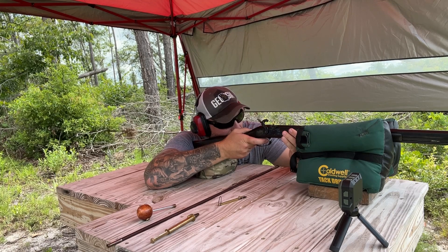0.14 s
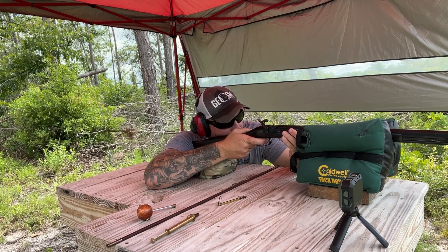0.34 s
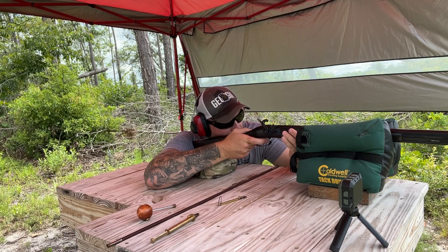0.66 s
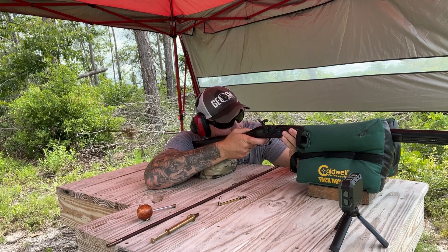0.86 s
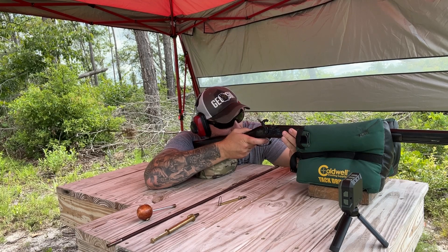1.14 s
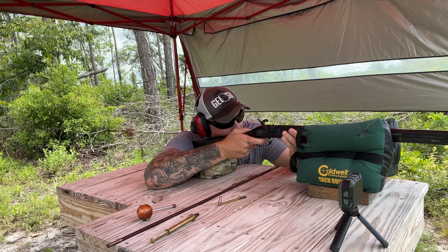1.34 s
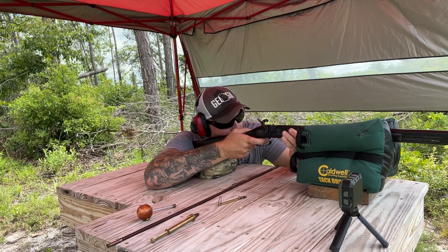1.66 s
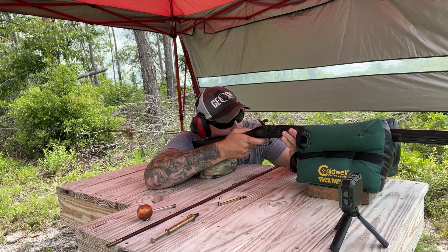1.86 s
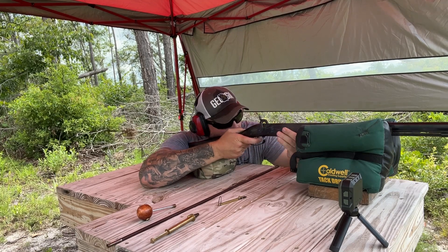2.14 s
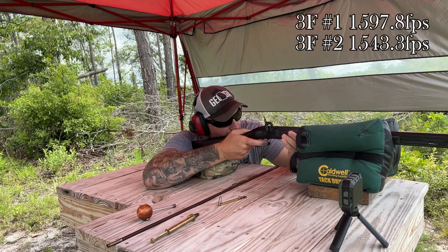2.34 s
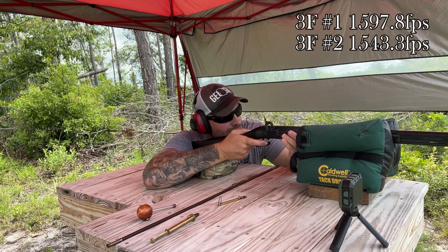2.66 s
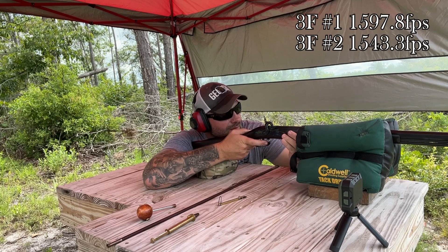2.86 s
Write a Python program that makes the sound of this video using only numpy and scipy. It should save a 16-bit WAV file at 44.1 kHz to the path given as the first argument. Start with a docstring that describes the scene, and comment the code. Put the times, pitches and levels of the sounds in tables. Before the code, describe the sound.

A rifle fires once, close to the microphone, after about two seconds of quiet woods with faint insects and two distant bird whistles. The sharp blast booms briefly, then a rolling echo returns from the trees and fades.

```python
"""A muzzleloading rifle in the woods

Insects, a low rumble and two bird whistles are heard. Then a rifle is fired from a bench under a
canopy: a brief ring swells into the crack of the cap and the overloaded blast. The shelter and near
trees answer, then the far tree line throws back a long roll that dulls as it dies."""
import sys
import numpy as np
from scipy import signal
from scipy.fft import rfft, irfft
from scipy.io import wavfile

SR = 44100
rng = np.random.default_rng(int(sys.argv[2]) if len(sys.argv) > 2 else 0)


def dump(signal):
    """Clip the signal to [-1, 1] and save it as 16-bit WAV at the path in sys.argv[1]."""
    limited = np.clip(np.atleast_2d(signal).T, -1, 1)
    pcm = np.round(limited * 32767).astype(np.int16)
    wavfile.write(sys.argv[1], SR, pcm)


N = 132300
T = np.arange(N) / SR
HZ = np.maximum(np.arange(N // 2 + 1) * SR / N, 1)
BLAST_S = 2.0468
SHELTER_S, SHELTER_ATTACK_S, SHELTER_HOLD_S = 2.063, 0.0082, 0.017

# How sound from the rifle reaches the left and right sides.
# Each row: frequency in Hz, how alike the sides are from 0 to 1, the left side's lead in radians.
FROM_RIFLE = [(60, 0.65, 1.8), (202, .5, 1.5), (440, 0.33, -1.83), (850, 0.63, -1.34), (1540, 0.38, -1.26),
              (2770, 0.41, -2), (4640, 0.34, -2.1), (7300, 0.28, -1.4), (10540, 0.67, 1.5)]
# The same for sound from down the range. Each row: frequency in Hz, likeness, left lead in radians.
FROM_DOWNRANGE = [(60, 0.72, 0.36), (180, 0.84, -0.5), (367, 0.81, -1.4), (740, 0.81, -2.6),
                  (1440, 0.56, -3.5), (2800, 0.22, -6.5), (4600, 0.06, -7.5), (7600, 0.35, -7.5),
                  (10400, 0.84, -6)]
# The roll from the woods. Each row: frequency in Hz, relative level in dB, seconds to fade by 60 dB.
WOODS_ROLL = [(30, -3.5, 1.6), (60, 0, 1.5), (172, -1.5, 3.2), (426, -6, 5.2), (830, -3.5, 3.35),
              (1490, -8, 2.44), (2960, -14, 2.2), (4980, -15.5, 1.33), (7200, -20, 1.16),
              (10000, -23.5, 0.88), (12100, -37, 0.76), (14000, -74, 0.71)]


def from_db(db):
    """Turn decibels into a factor to multiply by."""
    return 10 ** (np.asarray(db) / 20)


def unit_power(x):
    """Scale a sound so that its average power is 1."""
    return x / np.sqrt(np.mean(x ** 2) + 1e-20)


def at_hz(points, hz, column=1):
    """Look up a frequency in a table, sliding smoothly between the rows."""
    table = np.array(points)
    return np.interp(np.log(hz), np.log(table[:, 0]), table[:, column])


def side_phases(direction, hz):
    """Phase shifts in radians that put one side ahead and the other behind."""
    return 0.5 * at_hz(direction, hz, column=2) * np.array([[1], [-1]])


def noise(colour, direction, common=None):
    """Stereo noise shaped by a table of levels; the part both sides share comes from one direction."""
    likeness = np.clip(at_hz(direction, HZ), 0, 1)
    white = rng.standard_normal((3, N))
    shared = rfft(white[2] if common is None else unit_power(common))
    turn = np.exp(1j * side_phases(direction, HZ))
    both = np.sqrt(likeness) * shared * turn + np.sqrt(1 - likeness) * rfft(white[:2])
    return unit_power(irfft(both * from_db(at_hz(colour, HZ)), N))


def rifle_tone(hz, start, wobble=0):
    """A pure tone from the direction of the rifle; wobble shifts its phase, in radians."""
    return np.sqrt(2) * np.sin(2 * np.pi * hz * (T - start) + wobble + side_phases(FROM_RIFLE, hz))


def envelope(start, attack, hold, t60):
    """Rise over attack, stay for hold, then fade by 60 dB every t60; all are in seconds."""
    age = T - start
    fade = np.exp(-np.log(1000) * np.clip((age - attack - hold) / t60, 0, 5))
    return np.clip(age / attack, 0, 1) * fade


def drift(per_s):
    """Wander around zero, heading for a new random value per_s times a second."""
    return np.interp(T * per_s, np.arange(1000), rng.standard_normal(1000))


def background():
    """A low rumble under two choruses of insects; all drop at the shot and creep back."""
    # Sound from the undergrowth. Each row: frequency in Hz, left-right likeness, left lead in radians.
    from_undergrowth = [(60, 0.93, -0.23), (180, 0.83, -0.44), (353, 0.39, 0), (700, 0.37, -3.5),
                        (1400, .35, -5), (2700, 0.31, -6.5), (4600, .1, -8), (7710, .84, -8),
                        (9900, .95, -6.5)]
    # Rumble and leaves, high insects, and a farther chorus that throbs and swells.
    # Each row: frequency in Hz, relative level in dB.
    rumble_colour = [(25, -24.5), (49, -8), (86, -0.5), (124, -8), (160, -7.5), (250, -17), (540, -25),
                     (800, -33.5), (1150, -42.5), (1600, -45), (2150, -44), (2700, -38), (3600, -38.5),
                     (4800, -37), (5800, -42.5), (7800, -70.5)]
    insect_colour = [(5800, -30), (6600, -8.5), (7300, -5), (7750, -8), (8250, 3.5), (8550, -7),
                     (8900, -19.5), (10000, -21.5), (11000, -39), (15000, -44.5)]
    chorus_colour = [(2200, -42), (2650, -8.5), (3000, -0.5), (3350, -6.5), (3900, -37.5), (8000, -60)]
    throb_db, throbs_per_s, swell_db_per_s, hush_db = 3, 14, 3.6, -22.5
    rumble = from_db(-55.5 + 0.58 * drift(11.85)) * noise(rumble_colour, from_undergrowth)
    insects = from_db(-63.5 + 0.5 * drift(30)) * noise(insect_colour, from_undergrowth)
    throb = throb_db * np.sin(2 * np.pi * throbs_per_s * T + 2 * drift(5))
    chorus_db = -86 + swell_db_per_s * T + throb + 2 * drift(20)
    chorus = from_db(chorus_db) * noise(chorus_colour, from_undergrowth)
    hush = from_db(hush_db * envelope(BLAST_S, attack=0.0106, hold=0, t60=17))
    return (rumble + insects + chorus) * hush


def bird():
    """Distant whistles rise, level off and linger among the trees."""
    # The whistles. Each row: start and length in seconds, first pitch and target pitch in Hz,
    # glide time in seconds, level in dB.
    whistles = [(.863, .112, 1620, 1803, .017, -72.5), (1.475, 0.11, 1690, 2020, .035, -66.5)]
    # Their echoes from the trees. Each row: delay in seconds, level in dB relative to the whistle.
    whistle_echoes = [(.055, -15), (.31, -16.5)]
    fade_db_per_s = 28
    song = np.zeros(N)
    for start, length, first_hz, target_hz, glide, db in whistles:
        age = np.clip(T - start, 0, length)
        hz = target_hz + (first_hz - target_hz) * np.exp(-age / glide)
        arch = np.sqrt(np.abs(np.sin(np.pi * age / length)))
        song += from_db(db - fade_db_per_s * age) * arch * np.sin(2 * np.pi * np.cumsum(hz) / SR)
    echoes = sum(from_db(db) * np.interp(T - delay, T, song, left=0) for delay, db in whistle_echoes)
    trees = rng.standard_normal((2, N)) * envelope(0, attack=0.02, hold=0, t60=1.6)
    lingering = signal.fftconvolve(song[None], unit_power(trees) / np.sqrt(N), axes=1)[:, :N]
    return song + echoes + from_db(-6) * lingering


def far_trees():
    """A farther stand of trees sends back one late, dull swell."""
    # The tone of the swell. Each row: frequency in Hz, relative level in dB.
    colour = [(30, -20), (80, 1.5), (350, -4), (1200, -9), (3000, -46), (10000, -67)]
    swell = envelope(2.75, attack=0.016, hold=0.049, t60=0.26)
    return from_db(-39) * noise(colour, FROM_DOWNRANGE) * swell


def tree_clumps():
    """Clumps of trees send back short, low surges."""
    # The surges. Each row: start in seconds, level in dB, centre frequency in Hz.
    surges = [(2.559, -36.5, 350), (2.605, -35.5, 220), (2.668, -41, 550), (2.698, -40, 650),
              (2.805, -34.5, 330), (2.878, -39.5, 280), (2.912, -43.5, 480)]
    edge_ratio = 1.48
    roll, out = noise(WOODS_ROLL, FROM_DOWNRANGE), 0
    for start, db, hz in surges:
        band = signal.butter(1, [hz / edge_ratio, hz * edge_ratio], "band", fs=SR, output="sos")
        surge = unit_power(signal.sosfilt(band, roll))
        out += from_db(db) * surge * envelope(start, attack=0.0048, hold=0.0098, t60=0.05)
    return out


def woods():
    """Thousands of trunks each return a click, making a roll; the air takes the treble first."""
    # Lumpy bass and smooth treble. Each row: frequency in Hz, rough size of the flicker in dB.
    flicker_sizes = [(100, 2.6), (500, 2.4), (2000, 1.1), (8000, .5)]
    trunks_per_s, spread_db = 1100, 3.5
    sizes = from_db(spread_db * np.minimum(rng.exponential(1, N), 4)) * rng.choice([-1, 1], N)
    clicks = sizes * (rng.random(N) < trunks_per_s / SR)
    spectrum = rfft(noise(WOODS_ROLL, FROM_DOWNRANGE, common=clicks))
    shared_drift, out = 0.73 * drift(45), 0
    centres_hz = np.geomspace(40, 14000, 16)
    # Each frequency band flickers and fades at its own pace.
    for hz, this_band in zip(centres_hz, np.eye(len(centres_hz))):
        band = irfft(spectrum * np.interp(np.log(HZ), np.log(centres_hz), this_band), N)
        flicker = from_db(at_hz(flicker_sizes, hz) * (shared_drift + drift(40)))
        fade = envelope(2.338, attack=0.013, hold=0.087, t60=at_hz(WOODS_ROLL, hz, column=2))
        out += band * flicker * fade
    return from_db(-31) * out


def trunk_echoes():
    """Single far trunks return dulled cracks that stand out of the roll."""
    # The echoes. Each row: start in seconds, level in dB before dulling, seconds to fade by 60 dB,
    # frequency in Hz above which the treble is cut.
    echoes = [(2.3526, -18.5, 0.028, 2600), (2.3614, -29.5, .02, 2500), (2.378, -27, .012, 4500),
              (2.439, -21.5, 0.047, 2360), (2.4613, -28, 0.011, 2390), (2.7538, -21, 0.011, 1180)]
    # The tone of the crack before dulling. Each row: frequency in Hz, relative level in dB.
    colour = [(150, -4.5), (700, -12), (1100, -2), (1900, 9.5), (5000, -7.5), (11000, 1), (13500, -45)]
    crack, out = noise(colour, FROM_DOWNRANGE), 0
    for start, db, t60, edge_hz in echoes:
        echo = from_db(db) * crack * envelope(start, attack=0.00047, hold=0.00074, t60=t60)
        dull = signal.butter(2, edge_hz, fs=SR, output="sos")
        out += signal.sosfilt(dull, echo + 1e-18)
    return out


def near_echoes():
    """The shelter and near trunks boom, the open lane hisses faintly, and hard slaps come back."""
    # Sound from all around. Each row: frequency in Hz, left-right likeness, left lead in radians.
    from_all_around = [(60, 0.78, 0.3), (180, 0.82, -.4), (372, .7, -1), (750, .3, -4), (1500, 0.15, -3.5),
                       (2750, .1, -6.5), (4620, .1, -8.5), (7700, .65, -7.7), (10300, 0.76, -6)]
    # The tones of the boom, the hiss and the slaps. Each row: frequency in Hz, relative level in dB.
    boom_colour = [(30, -6), (60, 2), (95, -5), (150, 0), (250, 0), (320, -12), (700, -13.5), (1600, -12.5),
                   (4000, -15.5), (6000, -20), (10000, -22), (13000, -34), (16000, -35)]
    hiss_colour = [(30, -9), (60, 5), (150, -9), (500, -11.5), (2000, -16), (4500, -20), (10000, -24.5),
                   (12500, -37), (14000, -62)]
    slap_colour = [(100, -20), (400, -20), (800, -2), (1500, 2), (2600, 4), (4000, -1), (6500, -14),
                   (9800, -9), (16000, -36)]
    # Sharp echoes from nearby. Each row: start in seconds, level in dB, seconds to fade by 60 dB.
    slaps = [(2.0725, -22, 0.012), (2.1573, -15.5, 0.0045), (2.1738, -28.5, 0.006)]
    boom = from_db(-22) * noise(boom_colour, from_all_around)
    boom *= envelope(SHELTER_S, SHELTER_ATTACK_S, SHELTER_HOLD_S, t60=0.21)
    hiss = from_db(-42.5) * noise(hiss_colour, FROM_DOWNRANGE)
    hiss *= envelope(BLAST_S, attack=0.0033, hold=0.31, t60=0.63)
    slap_level = sum(from_db(db) * envelope(start, attack=0.00028, hold=0.00036, t60=t60)
                     for start, db, t60 in slaps)
    return boom + hiss + slap_level * noise(slap_colour, FROM_DOWNRANGE)


def shelter():
    """The canopy and bench sound like a drum after the blast."""
    # Their low notes. Each row: pitch in Hz, level in dB, seconds to fade by 60 dB.
    notes = [(60.7, -30.5, .25), (141, -30.5, 0.18), (233.8, -25, .15)]
    return sum(from_db(db) * np.sin(2 * np.pi * hz * (T - SHELTER_S))
               * envelope(SHELTER_S, SHELTER_ATTACK_S, SHELTER_HOLD_S, t60) for hz, db, t60 in notes)


def thumps():
    """Each low push of air is a swing of pressure that quickly dies away."""
    # The pushes. Each row: start in seconds, length of one swing in seconds, level in dB.
    pushes = [(2.038, 0.0069, -21.5), (2.062, 0.021, -24.5), (2.0797, 0.0083, -20.5), (2.093, 0.0068, -22),
              (2.168, 0.019, -33), (2.281, 0.018, -27), (2.356, 0.012, -25.5), (2.565, 0.014, -29),
              (2.79, 0.009, -30)]
    out = np.zeros(N)
    for start, period, db in pushes:
        cycles = np.clip((T - start) / period, 0, 10)
        out += from_db(db) * np.sin(2 * np.pi * cycles) * np.exp(-1.1 * cycles)
    return out


def metal_ring():
    """Rough metallic tones and a rattle swell for an instant and die under the blast."""
    # The ringing tones. Each row: pitch in Hz, level in dB at the top of the swell.
    notes = [(1459, -26), (1660, -34), (2234, -29), (2940, -23.5), (3100, -29.5), (4231, -32), (6250, -30),
             (7750, -31.5)]
    # The tone of the rattle. Each row: frequency in Hz, relative level in dB.
    rattle_colour = [(300, -11.5), (1000, -13.5), (1450, -3), (1850, -16.5), (2300, -4), (3000, -1),
                     (3700, -21), (6200, -12.5), (8200, -13.5), (9800, -40), (16000, -60.5)]
    start_s, peak_s, swell_db_per_s = 2.022, 2.041, 750
    swell = from_db(swell_db_per_s * np.minimum(T - peak_s, 0))
    level = swell * envelope(start_s, attack=0.0032, hold=peak_s - start_s, t60=0.03)
    tones = sum(from_db(db) * rifle_tone(hz, peak_s, wobble=0.5 * drift(61)) for hz, db in notes)
    rattle = from_db(-24) * noise(rattle_colour, FROM_RIFLE)
    return level * (tones + rattle)


def cap_crack():
    """The cap that lights the powder goes off with a bright crack."""
    # The tone of the crack. Each row: frequency in Hz, relative level in dB.
    colour = [(100, -12), (400, 4.5), (800, -2), (1400, -2), (3000, -3), (5500, -6.5), (9500, -0.5),
              (12000, -10.5), (16000, -17)]
    burst = envelope(2.0418, attack=0.00023, hold=0.001, t60=0.018)
    return from_db(-12.5) * noise(colour, FROM_RIFLE) * burst


def shock_wave():
    """Pressure jumps, falls into suction and recovers; three quick reflections off the bench follow."""
    start_s, push_s, gap_s = 2.047, 0.00025, 0.00105
    first_db, loss_db = -3, 1
    pressure = np.zeros(N)
    for bounce in range(4):
        age = np.clip((T - start_s - bounce * gap_s) / push_s, 0, 20)
        pressure += from_db(first_db - bounce * loss_db) * (age > 0) * (1 - age) * np.exp(-age)
    return irfft(rfft(pressure) * np.exp(1j * side_phases(FROM_RIFLE, HZ)), N)


def muzzle_blast():
    """Gas bursts from the barrel with a hollow boom, its peaks gently squashed."""
    # The tone of the gas. Each row: frequency in Hz, relative level in dB.
    colour = [(60, -1), (160, 0), (330, -6), (520, -4), (670, 1), (820, -4), (1020, 2), (1220, -9),
              (1550, -3), (2200, -8), (3100, -3.5), (5000, -12.5), (9000, -17), (16000, -39.5)]
    # The blast's hollow boom in the shelter. Each row: pitch in Hz, level in dB relative to the gas.
    notes = [(554, -11), (742, -15), (927, -14)]
    drive = 0.4
    boom = sum((-1) ** k * from_db(db) * rifle_tone(hz, BLAST_S) for k, (hz, db) in enumerate(notes))
    blast = unit_power(np.tanh(drive * (noise(colour, FROM_RIFLE) + boom)))
    return from_db(-11) * blast * envelope(BLAST_S, attack=0.00028, hold=0.0053, t60=0.009)


def scene():
    """The shot, its echoes and the quiet woods."""
    shot = cap_crack() + muzzle_blast() + shock_wave() + metal_ring() + thumps()
    echoes = shelter() + near_echoes() + trunk_echoes() + woods() + far_trees() + tree_clumps()
    return shot + echoes + bird() + background()


def record(dry):
    """The deepest bass is lost, the peaks overload, and the highest treble is cut."""
    low_cut_hz, high_stop_hz, ceiling = 36, 16600, 0.92
    bass_cut = signal.butter(3, low_cut_hz, "high", fs=SR, output="sos")
    treble_cut = signal.cheby2(14, 60, high_stop_hz, fs=SR, output="sos")
    clipped = np.clip(signal.sosfilt(bass_cut, dry), -ceiling, ceiling)
    return signal.sosfilt(treble_cut, clipped)


dry = scene()
out = record(dry)
dump(out)
```